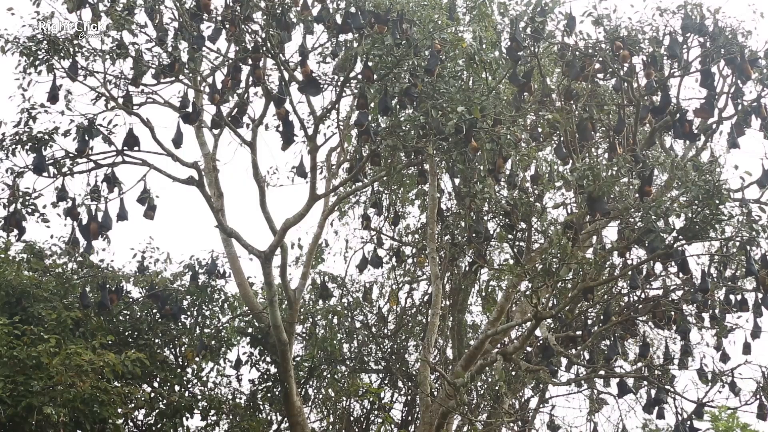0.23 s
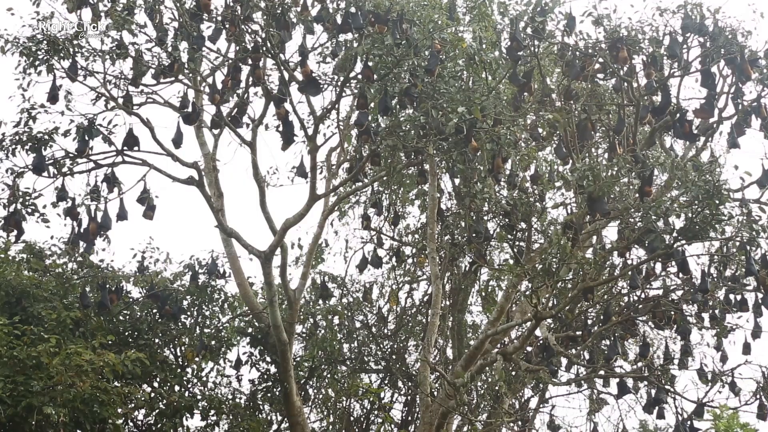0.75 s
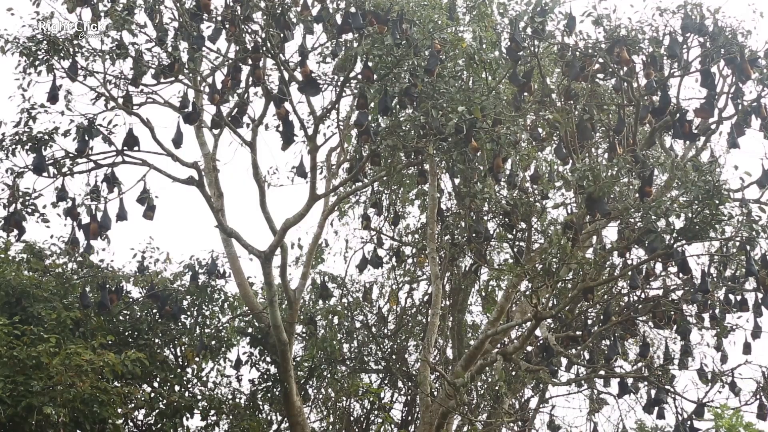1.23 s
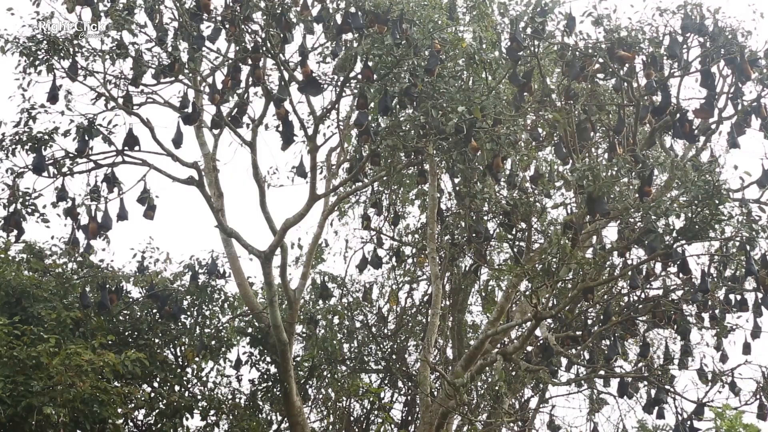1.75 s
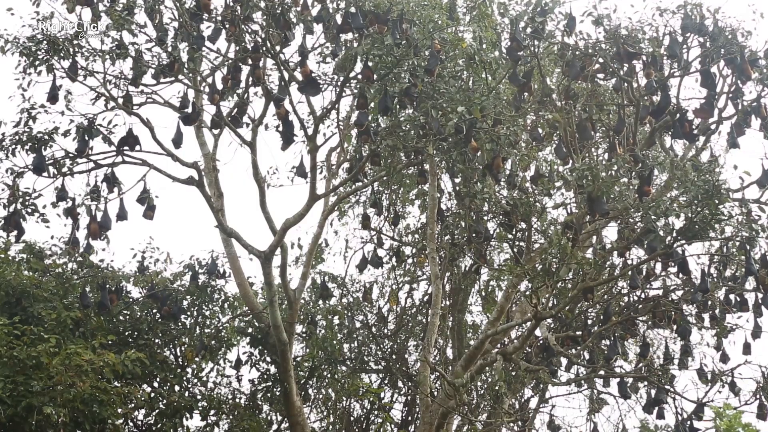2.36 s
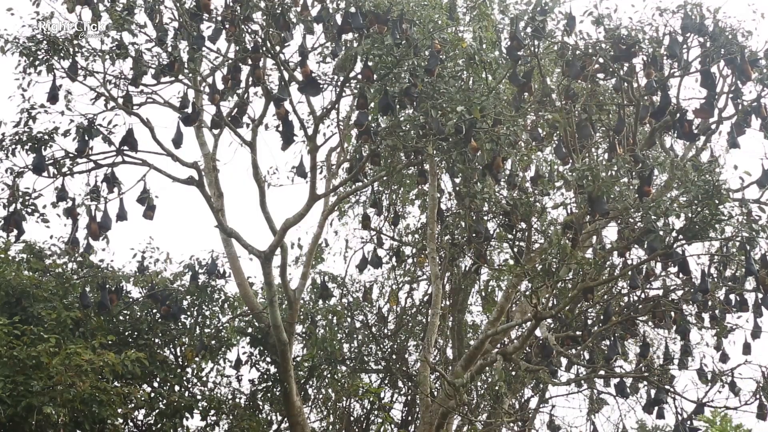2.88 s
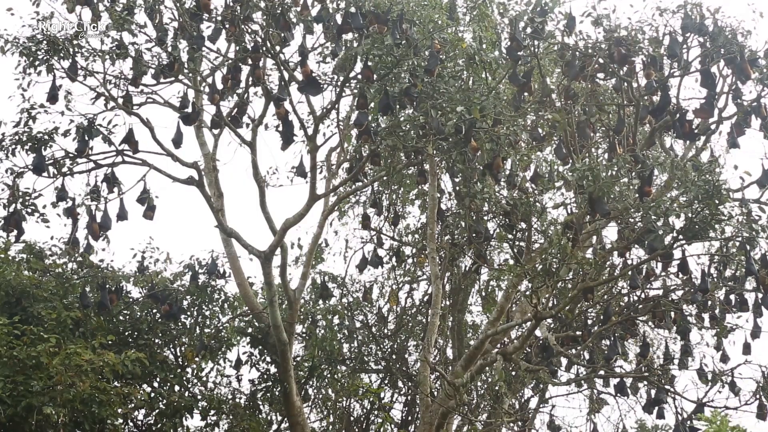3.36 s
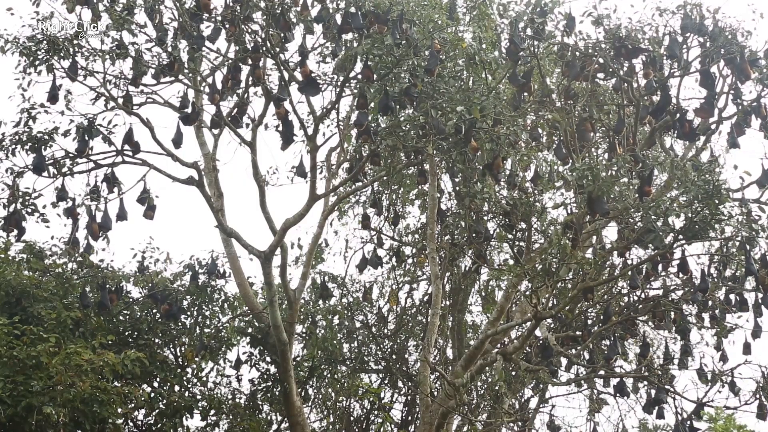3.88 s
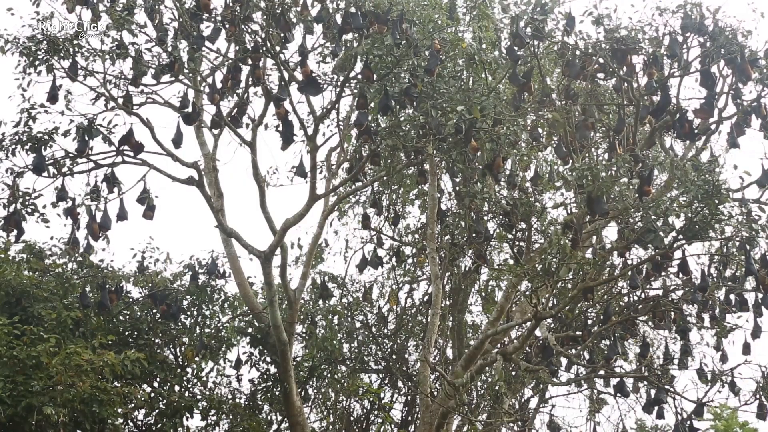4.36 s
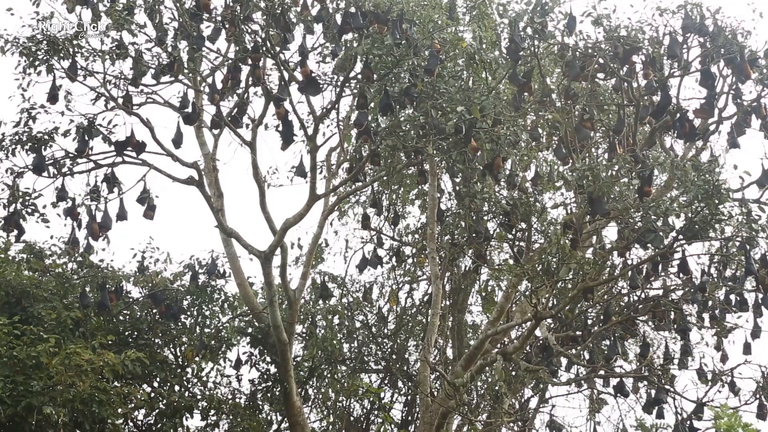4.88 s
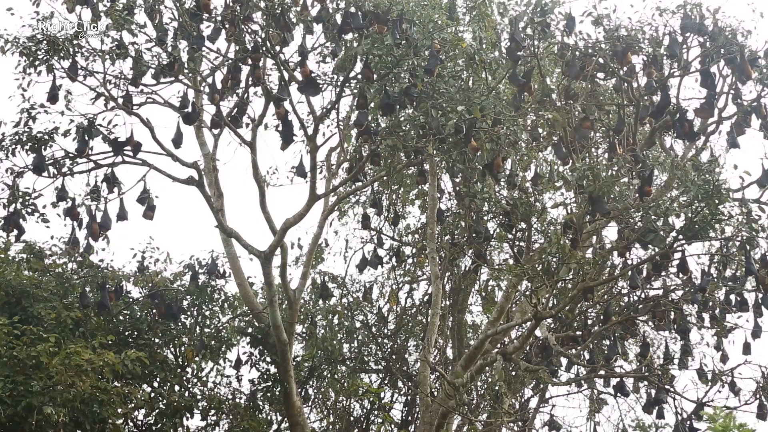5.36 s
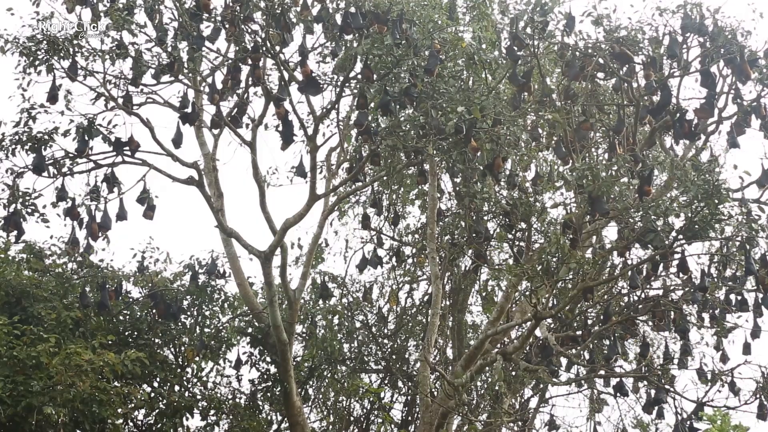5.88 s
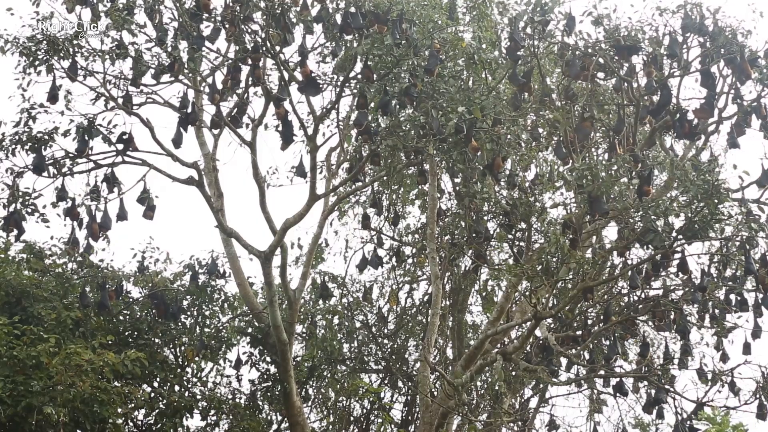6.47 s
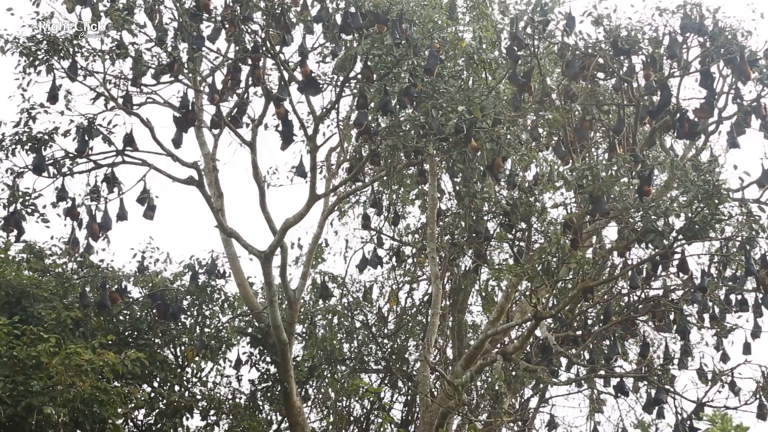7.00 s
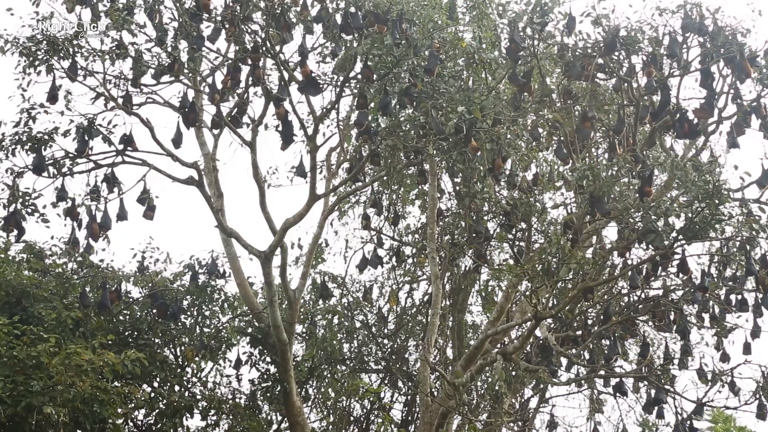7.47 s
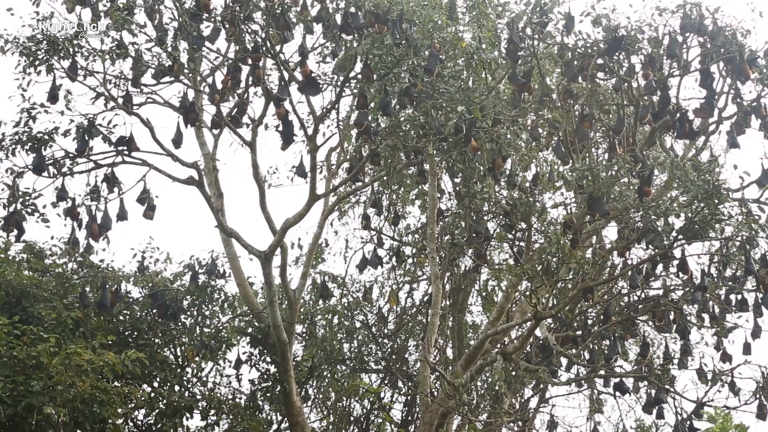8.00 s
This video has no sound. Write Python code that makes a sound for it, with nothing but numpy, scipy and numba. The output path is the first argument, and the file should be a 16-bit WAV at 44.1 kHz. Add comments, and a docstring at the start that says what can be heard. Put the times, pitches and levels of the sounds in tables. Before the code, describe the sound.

Quarrelling bats in a daytime roost. Rough high screeches and a thin nasal whine come first, then a soft woody knock and a couple of muffled yaps. A closer bat then squawks almost continuously, hoarse and bright, several short calls each second, with brief gliding squeals and puffs of breath. It grows dense at the end. Mono, open air, short diffuse echoes from trunks, quiet insects and distant colony behind.

```python
"""A near fruit bat squawks harshly in a roost tree, after another bat has screeched; whines, yaps and squeals join in.
Most calls are trains of uneven vocal pulses that ring the resonances of a small throat; squeals are gliding harmonics.
Gasps are puffs of filtered noise, and one soft knock is a short fading tone.
Trunks and leaves scatter the calls over filtered noise for air, the distant colony and insect hiss; the sound is mono."""
import sys
import numpy as np
from scipy import signal
from scipy.fft import rfft, irfft
from scipy.io import wavfile
from scipy.ndimage import uniform_filter1d
from numba import njit

SR = 44100
rng = np.random.default_rng(int(sys.argv[2]) if len(sys.argv) > 2 else 0)


def master(y):
    """Save y as 16-bit WAV."""
    cut = np.clip(np.atleast_2d(y).T, -1, 1)
    pcm = np.round(cut * 32767)  # scale
    wavfile.write(sys.argv[1], SR, pcm.astype(np.int16))


N = 362942
T = np.arange(N) / SR  # time of each sample [s]
TOP_HZ = 15900  # upper limit of the sound
RELEASE_S = .01  # how quickly a call dies away at its end
ACCENT_S = 0.049  # how quickly the push at the start of a screech relaxes
SCREECH_ACCENT_DB = 6  # extra level of that push


def undb(db):
    """Decibels to gain."""
    return 10 ** (np.asarray(db) / 20)


def unit(x):
    """Scale to an average (rms) level of 1."""
    return x / np.sqrt(np.mean(x ** 2) + 1e-18)


def even(x, size=900):
    """Hold the short-time rms level at 1, over a window of so many samples."""
    return x / np.sqrt(np.abs(uniform_filter1d(x * x, size)) + 1e-12)


def walk(rate):
    """Smooth random wander with a spread near 1 and about `rate` new targets a second."""
    k = max(int(SR / rate), 2)
    steps = np.repeat(rng.standard_normal(N // k + 1), k)
    return 1.3 * uniform_filter1d(steps, k)[:N]


def colour(x, points):
    """Filter noise or voice to a (frequency [Hz], level [dB]) outline, without sounding ahead of time."""
    hz, db = np.transpose(points)
    size = 2048
    f = np.maximum(np.fft.rfftfreq(size, 1 / SR), 1)
    # beyond both ends of the outline the level falls by a further 12 dB per octave
    outside = np.maximum(np.log2(hz[0] / f), 0) + np.maximum(np.log2(f / hz[-1]), 0)
    outline_db = np.interp(np.log(f), np.log(hz), db) - 12 * outside
    # folding the cepstrum gives the filter that responds soonest (minimum phase)
    cepstrum = irfft(np.log(undb(outline_db)))
    cepstrum[1:size // 2] *= 2
    cepstrum[size // 2 + 1:] = 0
    response = irfft(np.exp(rfft(cepstrum)))
    return signal.fftconvolve(x, response)[:N]


@njit
def svf(x, hz, width):
    """State-variable band-pass filter with a moving centre."""
    y, b, l = np.empty(len(x)), 0., 0.
    for i in range(len(x)):
        g, k = np.tan(np.pi * hz[i] / SR), width / hz[i]
        v = (b + g * (x[i] - l)) / (1 + g * (g + k))
        b, l, y[i] = 2 * v - b, l + 2 * g * v, k * v
    return y


def ring(x, hz, width_hz):
    """One resonance, fixed or moving."""
    return svf(x, hz * np.ones(len(x)), float(width_hz))


def split(x, hz):
    """The parts below and above a frequency."""
    low = signal.sosfiltfilt(signal.butter(3, hz, fs=SR, output="sos"), x)
    return low, x - low


def folds(hz, rough, jitter, scatter_db, skip_db, hiss):
    """Sharp closures of the vocal folds; roughness upsets their timing and size and lets air hiss through."""
    phase = np.cumsum(hz * (1 + .03 * walk(60))) / SR
    at = np.interp(np.arange(1, int(phase[-1])), phase, np.arange(N))
    cycle = at.astype(int)  # the sample where each cycle would close on time
    timing, strength = rng.standard_normal((len(at), 2)).T
    at = at + jitter * rough[cycle] * timing * SR / hz[cycle]
    # in patches every second closure weakens and the voice drops an octave
    skip = np.clip(.5 + walk(25), 0, 1)[cycle] * (np.arange(len(at)) % 2)
    size = undb(scatter_db * rough[cycle] * np.clip(strength, -2, 1) - abs(skip_db) * skip)
    # each closure is a smooth click, placed between samples
    taps = at.astype(int)[:, None] + np.arange(-5, 7)
    lag = taps - at[:, None]
    clicks = size[:, None] * np.sinc(lag) * np.sinc(lag / 6)
    pulses = np.bincount(np.clip(taps, 0, N - 1).ravel(), clicks.ravel(), N)
    # the hiss weakens through each cycle
    air = rng.standard_normal(N) * np.exp(-(phase % 1) / 0.65)
    return even(pulses) + hiss * rough * unit(air)


def tongue(x, depth_db, width_hz, rate):
    """Jaw and tongue never rest: small resonances slide, swell and fade, and ring on after each pulse."""
    out = x
    for hz in np.geomspace(2000, 12000, num=10):
        band = ring(out, hz * (1 + .05 * walk(rate)), width_hz * np.sqrt(hz / 3000))
        # turning a band over keeps its level but delays it
        out = out - (1 + undb(depth_db * walk(rate).clip(-2, 2))) * band
    return out


def syllables(rows, accent_db=0):
    """Gain of a run of calls, then the age [s] and any further columns of whichever call is loudest."""
    total, top = np.zeros(N), np.full(N, 1e-12)
    # outside the calls, the further columns rest at their averages and the age at 0
    held = np.outer(np.mean(rows, axis=0)[3:], np.ones(N))
    held[0] = 0
    for s, length, attack, db, *rest in rows:
        on = slice(*np.searchsorted(T, [s, s + length + 5 * RELEASE_S]))
        age = T[on] - s
        rise = 1 - np.exp(-age / attack)
        shape = rise / (1 + np.exp((age - length) / RELEASE_S + 1))
        power = (shape * undb(db + accent_db * np.exp(-age / ACCENT_S))) ** 2
        held[:, on] = np.where(power > top[on], np.broadcast_arrays(age, *rest), held[:, on])
        top[on] = np.maximum(top[on], power)
        total[on] += power
    return np.sqrt(total), *uniform_filter1d(held, size=300, axis=1)


def background():
    """Air in the trees, far bats chattering in shifting bands, and insects hissing in two narrow ones."""
    # outline of the air noise: (frequency [Hz], relative level [dB])
    air_outline = [(15, -32), (25, -7), (86, -3.5), (244, -4), (295, -1), (444, -4.5), (493, -2),
                   (565, -2.5), (605, -3), (769, -4), (994, -5.5), (1220, -5.5), (1350, -3.5), (1500, -6),
                   (1950, -22), (3300, -120)]
    # outline of the distant colony: (frequency [Hz], relative level [dB])
    colony_outline = [(710, -53), (1200, -17), (1270, -21), (1550, -26), (1620, -8), (3730, -13.5),
                      (4020, -14), (4620, -10.5), (5260, 6), (6240, -48.5), (6940, 3), (7730, -11),
                      (8510, 3.5), (10300, -17), (15500, -32)]
    insect_outline = [(4600, -30), (5300, -11.0), (6000, -13.5), (7600, -20), (8650, -7.0), (9600, -26.5)]
    air = unit(colour(rng.standard_normal(N), air_outline)) * undb(-51.5)
    far = unit(colour(rng.standard_normal(N), colony_outline)) * undb(-45 + 0.077 * walk(8.8))
    chatter = np.zeros(N)
    for hz in (2000, 2390, 2810, 4060):
        band = ring(rng.standard_normal(N), hz * (1 + 0.061 * walk(12)), 160)
        chatter += unit(band) * undb(4.1 * walk(11))
    insects = unit(colour(rng.standard_normal(N), insect_outline))
    return air + far + undb(-52.5) * unit(chatter) + undb(-47.5 + walk(30)) * insects


def knock():
    """One soft, woody knock: a low tone that fades at once."""
    # the knock: (start [s], starting level [dB], frequency [Hz], time to fade by 60 dB [s])
    soft_knock = (1.921, -35, 680, .025)
    s, db, hz, t60 = soft_knock
    t = np.maximum(T - s, 0)
    return undb(db - 60 * t / t60) * np.sin(2 * np.pi * hz * t)


def gasps():
    """A bat draws air through its open mouth: two soft resonances shape the noise."""
    # gasps between calls: (start [s], length [s], level [dB], lower resonance [Hz])
    breaths = [(1.125, 0.074, -47, 1040), (3.175, 0.071, -45, 1080), (3.679, 0.056, -49.5, 1050),
               (4.192, 0.086, -51, 1001), (4.678, 0.084, -52, 1015), (5.922, 0.07, -46, 997),
               (6.093, 0.048, -49.5, 1052), (7.187, 0.096, -43.5, 950), (8.039, 0.13, -41, 912)]
    out, air = np.zeros(N), rng.standard_normal(N)
    for s, length, db, hz in breaths:
        on = (T >= s) & (T < s + length)
        lower = ring(ring(air[on], hz, 1800), hz, 1800)
        puff = lower + ring(air[on], 2.48 * hz, 790)
        out[on] += unit(puff * np.sin(np.pi * (T[on] - s) / length)) * undb(db)
    return out


def squeals():
    """Gliding notes whose harmonics fall away on both sides of one resonance; hoarse ones shudder more."""
    # squeals and moans, from nearly clean to hoarse: (start [s], length [s], start pitch [Hz],
    # middle pitch [Hz], end pitch [Hz], level before a 2.5 dB cut [dB], resonance [Hz], depth of shudder [0-1])
    glides = [(.17, .045, 2200, 2550, 2650, -37, 2500, .5), (.52, .05, 2700, 2550, 2350, -40, 2500, .4),
              (2.61, .08, 4450, 4400, 4150, -51, 4400, .4), (4.89, .09, 1400, 1315, 1345, -36, 4500, .1),
              (5.105, .07, 4400, 3700, 3250, -49.5, 3700, .25),
              (5.26, .05, 3800, 3620, 3400, -55, 3600, .2), (5.34, .25, 548, 572, 478, -43.5, 1480, .7),
              (5.55, .08, 715, 670, 575, -46, 1800, .6), (5.725, .06, 1390, 1365, 1320, -44, 3000, .3),
              (6.795, .05, 1930, 2030, 2000, -39, 2030, .7)]
    out, waver, shudder = np.zeros(N), 1 + .003 * walk(300), walk(190)
    for s, length, start_hz, middle_hz, end_hz, db, throat_hz, hoarse in glides:
        on = (T >= s) & (T < s + length)
        u = (T[on] - s) / length  # progress through the note, 0-1
        glide = np.polyfit([0, .5, 1], [start_hz, middle_hz, end_hz], 2)
        hz = np.polyval(glide, u) * waver[on]
        phase = 2 * np.pi * np.cumsum(hz) / SR
        tone = np.zeros(len(u))
        for k in range(1, int(TOP_HZ / hz.max())):
            octaves_away = abs(np.log2(k * middle_hz / throat_hz))
            tone += undb(-13 * octaves_away) * np.sin(k * phase)
        swell = np.sin(np.pi * u) ** 0.27
        out[on] += unit(tone * (1 + hoarse * shudder[on]) * swell) * undb(db - 2.5)
    return out


def yapper():
    """Short, dull yaps whose two resonances climb across the first two yaps, then stay high."""
    # yaps from another branch: (start [s], length [s], attack [s], level before the last trim [dB])
    yaps = [(1.935, 0.098, .003, -33), (2.02, .07, 0.016, -30.5), (2.686, 0.014, .003, -28)]
    # outline of the throat: (frequency [Hz], relative level [dB])
    throat = [(590, -54), (1000, -32), (1200, -35), (1310, -17), (2120, -7), (2800, -4), (3400, -5.5),
              (4040, -1), (5880, -30), (8650, -15), (13000, -31)]
    pulse_hz, rough = 497, 0.52  # pulse rate of the folds; roughness 0-1
    source = folds(np.full(N, pulse_hz), np.full(N, rough), jitter=0.12, scatter_db=7, skip_db=2, hiss=0.99)
    voice = colour(source, throat)
    first_hz = np.interp(T, [1.94, 2.08], [2620, 3050])
    voice = voice + 1.7 * ring(voice, first_hz, 300) + 1.6 * ring(voice, 1.42 * first_hz, 350)
    return even(voice) * syllables(yaps)[0] * undb(-1.5 + 0.73 * walk(30.15))


def whine():
    """Slow creaking pulses ring one narrow, slowly sinking resonance."""
    # whines between the screeches: (start [s], length [s], attack [s], level before a 2 dB cut [dB])
    whines = [(.725, 0.2, .03, -34.5), (.865, 0.04, .012, -27), (.9, 0.099, .01, -37.5),
              (.985, 0.055, 0.01, -30.5), (1.06, .15, 0.0083, -38)]
    # outline of the throat: (frequency [Hz], relative level [dB])
    throat = [(1060, -66), (1800, -41), (2000, -24), (2580, -7), (2950, 1), (3340, -12), (4320, -15),
              (6050, -6.5), (7670, -15.5), (8850, -24), (10000, -43), (13000, -69), (22000, -120)]
    pulse_hz = 185 * (1 + .1 * walk(15))
    source = folds(pulse_hz, np.full(N, .6), jitter=.25, scatter_db=7, skip_db=7, hiss=.5)
    voice = colour(source, throat)
    sinking_hz = np.interp(T, [.88, 1.2], [3010, 2720]) * (1 + 0.015 * walk(25.3))
    voice = voice + 0.9 * ring(voice, sinking_hz, 200)
    return even(voice) * syllables(whines)[0] * undb(-2.0)


def screecher():
    """Strained screeches: rough pulses ring a tightening throat; the last ones cut across the near bat."""
    # screeches of the first bat: (start [s], length [s], attack [s], level before accent and trim [dB])
    screeches = [(.048, 0.056, .014, -36.5), (.09, .085, 0.0086, -42), (.17, 0.4, 0.023, -30.5),
                 (.635, 0.06, 0.017, -35.5), (1.028, 0.073, 0.0057, -26), (1.228, .56, 0.017, -27.5)]
    # late, narrower screeches: (start [s], length [s], attack [s], level before accent and trim [dB])
    retorts = [(7.46, .2, 0.017, -33.5), (7.66, .11, .01, -35), (7.79, 0.215, 0.0051, -32.5)]
    # outline of the throat: (frequency [Hz], relative level [dB])
    throat = [(530, -75), (900, -23), (1240, -39), (1520, -19.5), (1820, -17), (3300, -2), (4230, -6),
              (4820, -5.5), (5700, -16), (7060, -6.5), (7770, -17), (8650, -17.5), (9630, -27),
              (10600, -20), (15500, -41)]
    pulse_hz, rough = 511.5, 0.43  # pulse rate of the folds; roughness 0-1
    source = folds(np.full(N, pulse_hz), np.full(N, rough), jitter=0.11, scatter_db=2.5, skip_db=6.5, hiss=0.93)
    voice = colour(tongue(source, depth_db=5.0, width_hz=140, rate=20), throat)
    # from one screech to the next the throat tightens: its resonances rise and stand out more
    strain = np.interp(T, [.4, 1.3], [0, 1])
    first_hz = (3050 + 280 * strain) * (1 + .01 * walk(12))
    first = ring(voice, first_hz, 330)
    second = ring(voice, 1.444 * first_hz, 400)
    third = .7 * ring(voice, 2.09 * first_hz, 500)
    voice = voice + (0.39 + 0.6 * strain) * (first + second + third)
    # each screech starts with a push that soon relaxes
    early = even(voice) * syllables(screeches, SCREECH_ACCENT_DB)[0] * undb(-1 + 0.66 * walk(45.1))
    late = even(ring(voice, 3910, 1300)) * syllables(retorts, SCREECH_ACCENT_DB)[0] * undb(-2.5)
    return early + late


def squawker():
    """Rasping squawks; the opening mouth lifts resonance and pitch, and effort clears the voice."""
    # squawks of the near bat: (start [s], length [s], attack [s], level before flutter [dB],
    # open mouth resonance [Hz], upper resonances relative to the first, before a trim [dB])
    squawks = [ (2.315, 0.071, 0.01, -34.5, 2451, 5), (2.385, 0.17, 0.016, -36, 2560, 2),
               (2.735, 0.082, .012, -42.5, 2520, -1), (2.897, 0.08, 0.03, -18.5, 2819, 6),
               (2.97, 0.1, .012, -23.5, 2797, 4.5), (3.065, 0.051, 0.0072, -26.5, 2580, -5),
               (3.11, 0.052, 0.0081, -25.5, 2333, -3), (3.302, 0.034, 0.0085, -26, 2302, 2),
               (3.319, .068, 0.0046, -19.5, 2699, 4.5), (3.375, .1, 0.0089, -25.5, 2622, 3.5),
               (3.47, 0.1, .012, -27, 2719, 0.5), (3.565, 0.059, 0.011, -23.5, 2839, -1.5),
               (3.605, 0.071, 0.0086, -28, 2742, 2), (3.797, 0.051, .02, -28, 2802, 0),
               (3.86, 0.069, 0.023, -23.5, 2643, -1.5), (3.925, 0.086, .012, -28, 2899, 0),
               (4.0, .11, .012, -29, 2718, 0), (4.1, 0.079, 0.011, -24, 2699, 3),
               (4.175, 0.089, 0.0095, -41.5, 2652, -3), (4.301, .085, .008, -22.5, 2895, 1),
               (4.38, 0.11, 0.0077, -31.5, 2698, 3.5), (4.46, .1, .04, -19.5, 2581, 1),
               (4.55, .12, .01, -29.5, 2529, 0.5), (4.812, .072, 0.03, -21.5, 2517, 2),
               (4.875, 0.12, .01, -37, 2432, 11), (4.965, 0.087, 0.042, -22.5, 2469, 4),
               (5.172, 0.051, 0.0021, -33, 2229, 2.5), (5.33, 0.072, .02, -32, 1847, -5),
               (5.493, 0.057, 0.0049, -27, 2038, -1.5), (5.53, 0.036, 0.0073, -26.5, 2780, -1),
               (5.645, 0.043, 0.0087, -37, 2751, 0), (5.76, 0.066, 0.016, -30.5, 2849, 2),
               (5.815, .1, 0.037, -28.5, 3039, 4.5), (6.007, .068, 0.016, -29, 3202, 3),
               (6.075, 0.068, .012, -40.5, 2993, 4.5), (6.16, .075, 0.027, -26.5, 2850, 7.5),
               (6.325, 0.075, 0.019, -26.5, 2885, 7), (6.4, 0.12, 0.0095, -33, 2905, 2.5),
               (6.5, 0.098, .015, -27.5, 2763, 2.5), (6.725, .065, 0.013, -30.5, 2704, 2.5),
               (6.79, 0.11, 0.014, -31.5, 2399, 3), (6.89, .1, .015, -28.5, 2784, 1.5),
               (6.985, 0.12, 0.0091, -31.5, 2687, 3.5), (7.095, 0.069, 0.013, -24.5, 2881, 3.5),
               (7.3, .078, 0.029, -23, 2783, 0.5), (7.375, 0.1, 0.0094, -31.5, 2745, 5),
               (7.455, 0.23, 0.011, -30, 3082, 5), (7.662, 0.068, .015, -23, 2946, 3.5),
               (7.718, 0.074, 0.013, -22.5, 3030, 4.5), (7.785, .12, .01, -25, 2993, 3.5),
               (7.895, 0.12, 0.006, -24.5, 2961, 3.5), (8.196, 0.049, 0.0083, -22, 2998, -0.5), ]
    # outline of the throat: (frequency [Hz], relative level [dB])
    throat = [(300, -22.5), (550, -17), (1180, -26), (1450, -11), (2000, -4), (2700, -4.5), (3800, -7.5),
              (4400, -5), (5600, -.5), (7000, -4.5), (10000, -9.5), (12500, -18), (15500, -30)]
    # strength of the hissing top: (time [s], relative level [dB])
    edge_level = [(2.4, 3.5), (2.9, -1), (4.0, -0.5), (4.8, -4), (5.0, 1), (5.3, -4.5), (6.2, -1),
                  (7.0, 1.5), (7.8, 1), (8.2, 2)]
    mouth_shut, mouth_opens_s = .13, .022  # the resonance starts this share low and rises this quickly
    pulse_hz, rest_mouth_hz, pitch_follows = 482.3, 2660, .25  # pitch rises with the mouth, by this power
    soft_db, soft_rough, clears_per_db = -30, 0.793, 0.05  # the harder the push, the more regular the pulses
    foot_db, foot_fades_per_db = -3, 1.4  # the small low resonance shows most in soft squawks

    gain, age, open_hz, bright_db = syllables(squawks)
    opening = 1 - mouth_shut * np.exp(-age / mouth_opens_s)
    mouth_hz = open_hz * opening * (1 + .012 * walk(25))
    effort_db = 20 * np.log10(gain + 1e-9) - soft_db
    rough = np.clip(soft_rough - clears_per_db * effort_db, .12, .9)
    pitch_hz = pulse_hz * (mouth_hz / rest_mouth_hz) ** pitch_follows
    source = folds(pitch_hz, rough, jitter=0.2272, scatter_db=0.5, skip_db=14.0, hiss=1.0)
    voice = colour(tongue(source, depth_db=4, width_hz=80, rate=26), throat)
    low, upper = split(voice, 4510)
    first = 0.38 * low + 1.79 * ring(low, mouth_hz, 330)
    # a small resonance, wavering slightly, rings at the foot of the voice
    foot = ring(low, 1450 * (1 + 0.021 * walk(13)), 91)
    first = first + undb(foot_db - foot_fades_per_db * effort_db.clip(-5, 10)) * foot
    # the second resonance follows the first about an octave above
    second_hz = (2.06 * mouth_hz).clip(4600, 6500) * (1 + 0.1 * walk(22))
    upper = upper + 0.64 * ring(upper, second_hz, 720)
    upper, edge = split(upper, 6300)
    edge_db = np.interp(T, *np.transpose(edge_level)) + 1.9 * walk(23)
    upper = upper + undb(edge_db) * edge
    flutter = undb(-0.56 + 1.07 * walk(40))
    brightness = undb(bright_db - 0.63 + 0.89 * walk(35))
    return even(even(first) + brightness * even(upper)) * gain * flutter


def trees(x, near_db, far_db, t60):
    """Quick reflections that shift as the bats sway and turn, each with a diffuse tail from trunks and leaves."""
    t, out = T[:SR // 2], x
    facing = np.array([walk(13) for _ in range(12)])
    # the calls are shared among 12 echo patterns, with a steady total power
    for share in facing / np.linalg.norm(facing, axis=0):
        near, far = rng.standard_normal((2, len(t)))
        near = near * (t > .0004) * np.exp(-t / 0.0098)
        # the tail is duller, builds up gently and fades by 60 dB per t60
        fade = np.exp(-np.log(1000) * t / t60)
        far = signal.lfilter([1], [1, -.45], far) * (1 - np.exp(-t / 0.021)) * fade
        response = undb(near_db) * near / np.linalg.norm(near) + undb(far_db) * far / np.linalg.norm(far)
        out = out + signal.oaconvolve(x * share, response)[:N]
    return out


def scene():
    """All callers and the knock among the trees, over the background."""
    calls = screecher() + whine() + yapper() + squawker() + squeals() + gasps() + knock()
    mono = trees(calls, near_db=-3.5, far_db=-12.5, t60=0.43) + background()
    return np.array([mono, mono])


def record(dry):
    """The recorder cuts the top with a steep low-pass filter."""
    return signal.sosfilt(signal.ellip(10, .2, 70, TOP_HZ, fs=SR, output="sos"), dry)


dry = scene()
out = record(dry)
master(out)
```